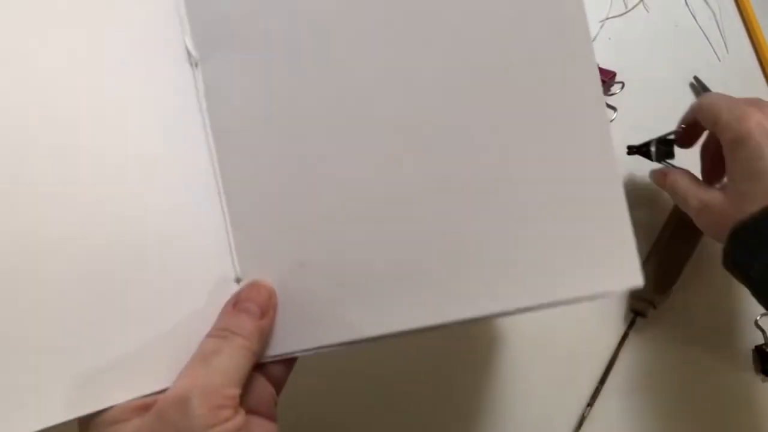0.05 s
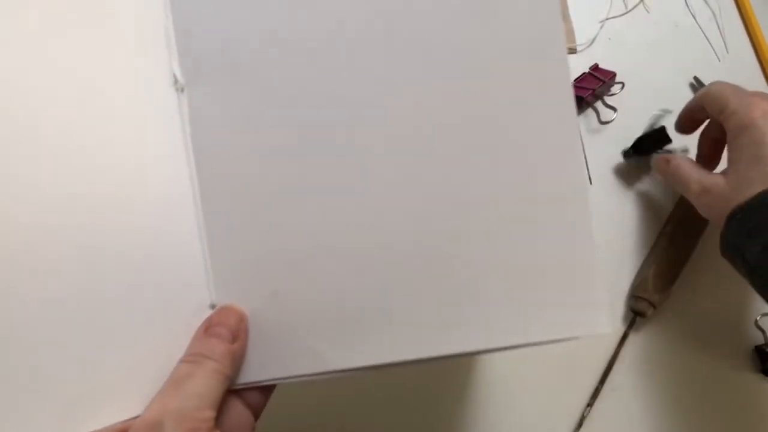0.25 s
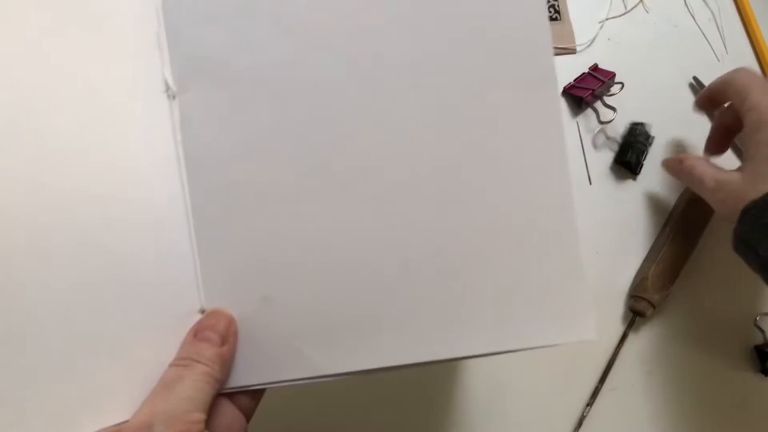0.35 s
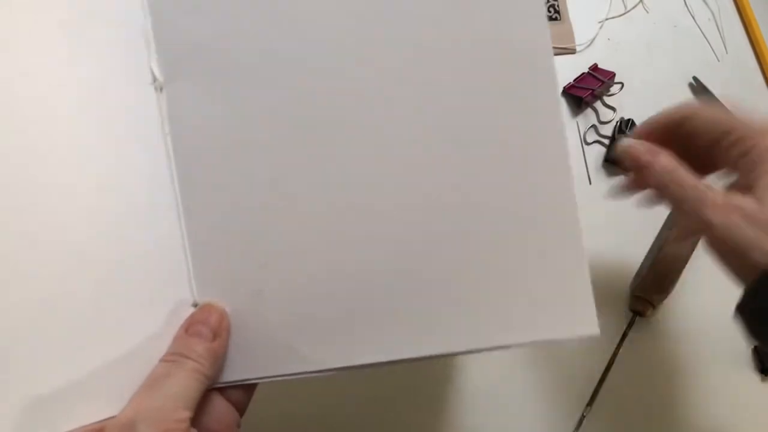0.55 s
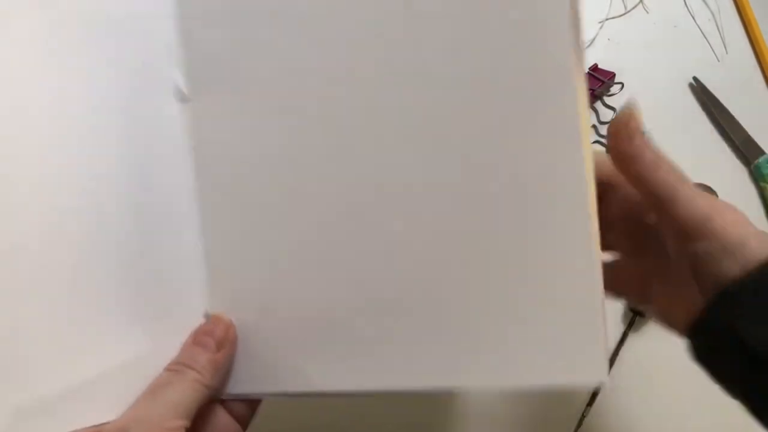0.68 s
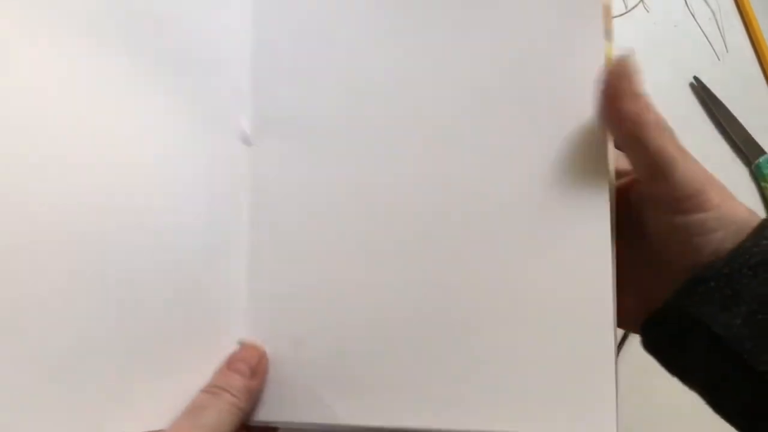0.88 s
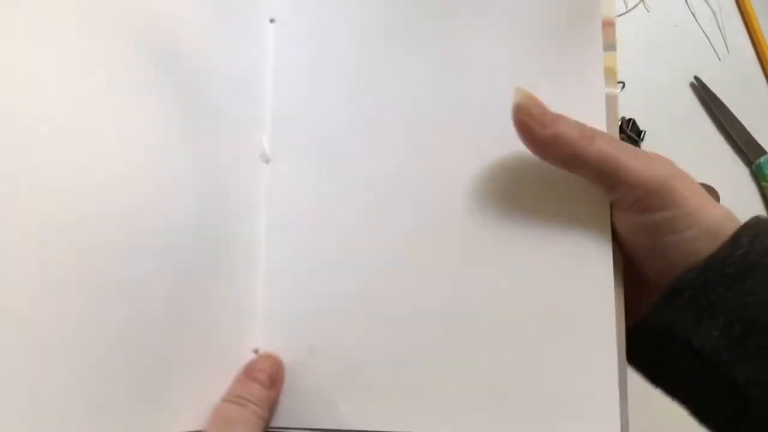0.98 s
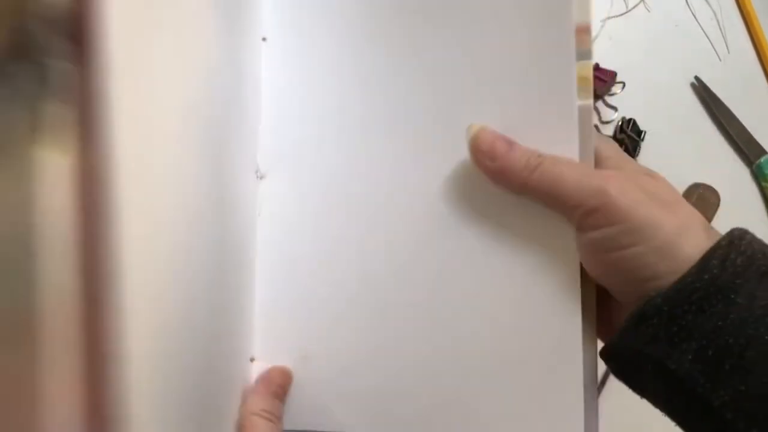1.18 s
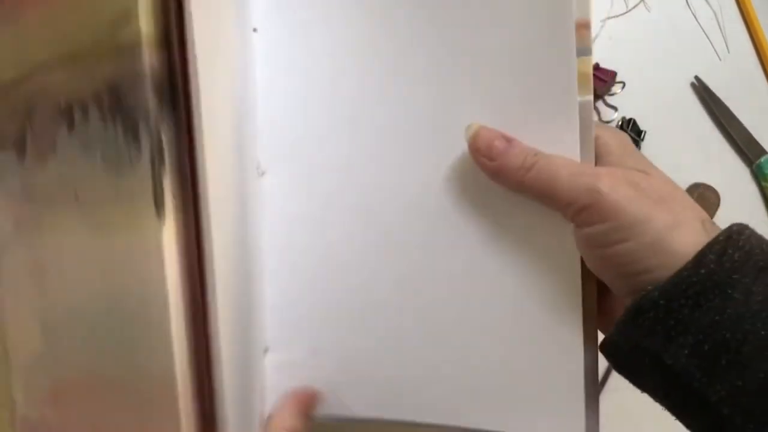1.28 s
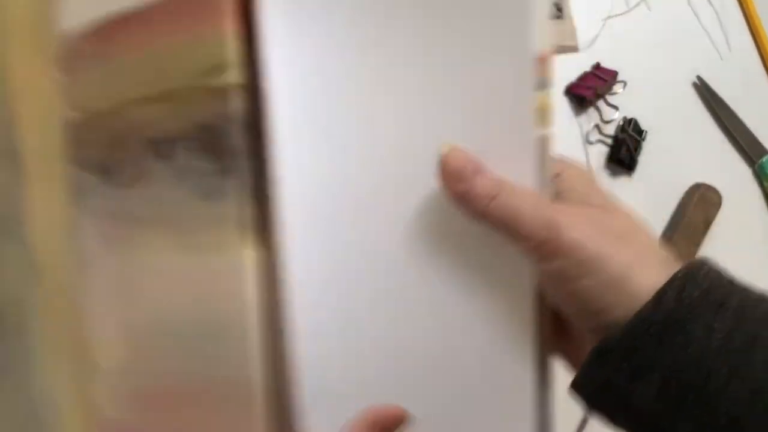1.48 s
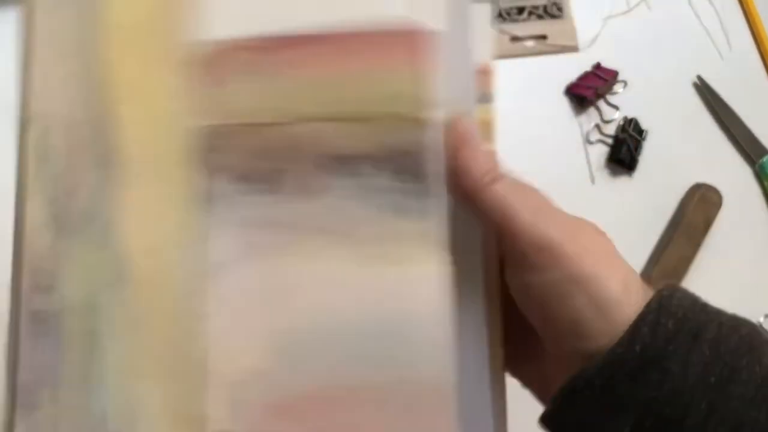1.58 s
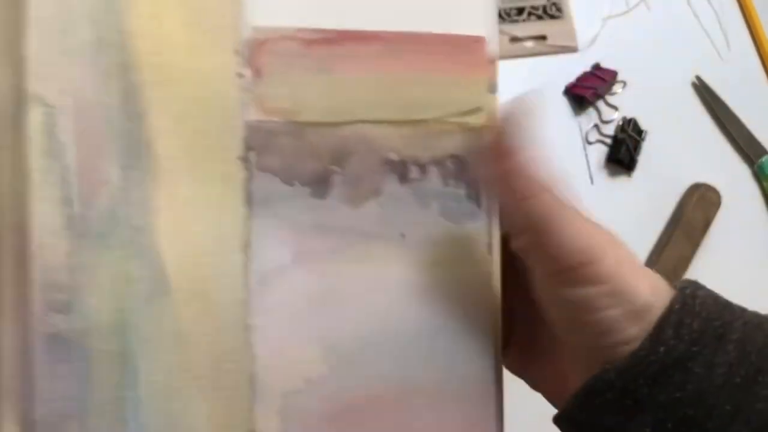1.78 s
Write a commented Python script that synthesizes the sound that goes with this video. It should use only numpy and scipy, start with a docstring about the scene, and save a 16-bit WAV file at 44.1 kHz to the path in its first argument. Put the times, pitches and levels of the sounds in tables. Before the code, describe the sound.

A small metal clip clatters on a table, then a stiff page is turned.

```python
"""A small steel binder clip drops on a table, bounces ever faster and rattles to rest: each hit rings
its spring and wire handles and knocks the tabletop. A hand then brushes a sketchbook, slides a stiff
page off the next one with a grainy rush of fibres and turns it. The page flaps down and fingers tap
the book. A small, quiet room."""
import sys
import numpy as np
from scipy import signal
from scipy.fft import rfft, irfft, next_fast_len
from scipy.io import wavfile
from scipy.ndimage import map_coordinates

SR = 44100
rng = np.random.default_rng(int(sys.argv[2]) if len(sys.argv) > 2 else 0)


def unload_wav(signal):
    """Save mono or channel-first audio to the path in sys.argv[1] as 16-bit WAV at rate SR, clipped to [-1, 1]."""
    wavfile.write(
        sys.argv[1],
        SR,
        np.round(np.clip(np.atleast_2d(signal).T, -1, 1) * 32767).astype(np.int16),
    )


N = 81585

SPRING_MODES = [(3376, -5.5, 0.019), (3660, -9, 0.011), (4055, -1, 0.02), (4290, -3.5, 0.025),
                (4604, 4, 0.023), (5000, -2.5, 0.037), (5360, -16, 0.024)]
# colour of the spring's noisy chatter: f/Hz, level/dB
CHATTER_COLOUR = [(300, -66), (2400, -15), (3300, -11.5), (4700, -3.5), (5300, -3.5), (6000, -9.5),
                  (8000, -13.5), (16000, -24.5)]
HARD_ATTACK_S, SOFT_ATTACK_S = 0.00055, 0.0017
CLIP_ROOM_DB, PAPER_ROOM_DB = -8.5, -21  # reverb sends


def binder_clip():
    """Each bounce rings the spring and its wire handles and knocks the table."""
    # hits: t/s, spring/dB, spring tilt/(dB per octave), handles/dB, crack/dB, clack/dB, thump/dB
    bounces = [(0.2324, -21.5, -4.5, -52, -24, -20.5, -28.5), (0.2819, -16, -6, -23, -30, -24, -32),
               (0.3435, -16.5, -1, -25, -23, -41, -27), (0.363, -30.5, -14, -52, -34, -36, -62),
               (0.401, -22.5, 0.5, -39, -26.5, -39.5, -32), (0.4369, -25, 5.5, -49, -34, -38, -36),
               (0.4596, -31, 6, -53.5, -40.5, -40, -39), (0.4753, -30.5, 12, -58, -47, -41, -46)]
    # thin ring of the wire handles: f/Hz, level/dB, t60/s
    handle_modes = [(9140, -12, 0.01), (9650, 1, 0.014), (10300, -7, .012), (10520, 1, 0.014)]
    # bright crack of the hit: f/Hz, level/dB
    crack_colour = [(500, -32), (3000, -27), (6500, -6), (8000, -4), (10000, -2.5), (11700, -6), (13500, 2),
                    (16000, -2)]
    # noisy part of the table's clack: f/Hz, level/dB
    clack_colour = [(80, -10), (200, 3.5), (450, 2), (700, -2.5), (1100, -2), (2000, -4.5), (2500, -7),
                    (5000, -2.5), (16000, -32.5)]
    # pitched part of the clack: f/Hz, level/dB, t60/s
    clack_modes = [(514, -3.5, 0.035), (930, -1, 0.087), (1153, 2.5, 0.055), (1467, -2.5, 0.062),
                   (1794, 3, 0.055), (2170, 4, 0.047), (2800, -4, 0.018)]
    # low ring of the whole tabletop: f/Hz, level/dB, t60/s
    table_modes = [(143.7, -4.5, 0.36), (202, -0.5, 0.049), (265, 3.5, 0.039), (293, 1.5, 0.12),
                   (430, -3, 0.085), (502, 1, 0.058)]
    table_lag_s = 0.00301  # the whole top swings a moment after the contact
    out = np.zeros(N)
    for s, spring_db, tilt_db, handles_db, crack_db, clack_db, thump_db in bounces:
        spring = burst(tilted(CHATTER_COLOUR, tilt_db), t60=0.018, attack=HARD_ATTACK_S)
        spring += amp(-6) * ring(tilted(SPRING_MODES, tilt_db), HARD_ATTACK_S, scatter_db=3.5)
        handles = ring(handle_modes, HARD_ATTACK_S, scatter_db=5)
        crack = burst(crack_colour, t60=0.035, attack=HARD_ATTACK_S)
        metal = amp(spring_db) * spring + amp(handles_db) * handles + amp(crack_db) * crack
        clack = burst(clack_colour, t60=0.035, attack=HARD_ATTACK_S)
        clack += amp(-8) * ring(clack_modes, HARD_ATTACK_S, scatter_db=2.5)
        clack += amp(-3.5) * push(push_s=0.00024)
        thump = 0.37 * ring(table_modes, SOFT_ATTACK_S, scatter_db=4.5) + push(push_s=0.00057)
        add(out, s, in_room(metal + amp(clack_db) * clack, CLIP_ROOM_DB))
        add(out, s + table_lag_s, amp(thump_db) * in_room(thump, room_db=-17.5, early_db=-12))
    return out


def rattle(count):
    start_s, length_s, attack_s = 0.405, 0.1, 0.0013
    out = np.zeros(N)
    for k in range(count):
        progress = (k + rng.random()) / count
        contact = ring(SPRING_MODES, attack_s, scatter_db=3)
        contact += amp(1) * burst(CHATTER_COLOUR, t60=0.046, attack=attack_s)
        add(out, start_s + length_s * progress, amp(-42.5 - 4 * progress ** 2) * contact)
    return in_room(out, CLIP_ROOM_DB)


def page_slide():
    """The page drags over its neighbour, brightens towards the edge and comes free."""
    # fader moves of the slide: t/s, body/dB, hiss/dB
    moves = [(0.87, -75, -93), (0.924, -51.5, -62.5), (0.99, -61, -69), (1.026, -56, -65),
             (1.042, -51, -81), (1.052, -60, -70), (1.106, -55.5, -72), (1.136, -46, -60),
             (1.168, -42.5, -68), (1.176, -52.5, -61), (1.202, -52.5, -60.5), (1.232, -46, -55),
             (1.33, -47, -44.5), (1.37, -45, -42), (1.394, -58, -66), (1.508, -53.5, -59), (1.53, -52, -49)]
    # midrange body of the rub: f/Hz, level/dB
    body_colour = [(100, -3), (400, -6.5), (800, -4.5), (1300, 0.5), (2600, 0), (4000, -2.5), (5500, -5),
                   (7500, -16), (11000, -28), (16000, -22)]
    # airy hiss on top: f/Hz, level/dB
    hiss_colour = [(200, -32), (2500, -7.5), (5000, -3), (8000, -2), (10500, -4), (13000, -2.5),
                   (16000, -8)]
    attack_s, release_s = 0.015, 0.11
    t = np.arange(N) / SR
    fade_in = (t - moves[0][0]) / attack_s
    fade_out = 1 + (moves[-1][0] - t) / release_s
    touching = np.clip(np.minimum(fade_in, fade_out), 0, 1)
    body_db, hiss_db = curves(moves)
    body = amp(body_db - 1.5) * friction(body_colour)
    hiss = amp(hiss_db + 0.5) * friction(hiss_colour)
    return touching * (body + hiss)


def scrapes():
    """Friction excites broad resonances that glide as the sheet bends."""
    # resonant sweeps: t/s, length/s, start f/Hz, end f/Hz, level/dB
    glides = [(0.726, 0.064, 1718, 1813, -57), (.89, 0.21, 946, 1267, -64), (0.9, 0.17, 3534, 3050, -59),
              (1.205, 0.061, 450, 898, -55), (1.25, 0.043, 2063, 2090, -48.5),
              (1.278, 0.098, 3400, 3100, -43.5), (1.297, 0.0504, 1390, 1728, -45.5)]
    out, t = np.zeros(N), np.arange(N) / SR
    for s, length, from_hz, to_hz, db in glides:
        progress = np.clip((t - s) / length, 0, 1)
        phase = 2 * np.pi * np.cumsum(from_hz + (to_hz - from_hz) * progress) / SR
        width_hz = 0.4 * to_hz
        band = wobble(width_hz) * np.cos(phase) + wobble(width_hz) * np.sin(phase)
        out += amp(db) * np.sin(np.pi * progress) * unit(band)
    return out


def brushes():
    """Short finger strokes over the paper swell and die away."""
    # finger strokes: t/s, rise/s, t60/s, level/dB
    strokes = [(0.638, 0.0088, 0.081, -46.5), (.68, 0.016, 0.049, -54.5), (0.727, 0.015, 0.19, -46.5),
               (.775, 0.024, 0.5, -58), (1.151, 0.0144, 0.024, -41), (1.582, 0.01, 0.038, -43.5),
               (1.62, 0.0033, 0.37, -51), (1.709, 0.051, 0.11, -51)]
    # swish of skin on paper: f/Hz, level/dB
    brush_colour = [(100, 2), (500, -7), (1000, 5), (1400, 0), (1800, -1.5), (3500, -3.5), (6500, -10.5),
                    (10500, -16), (13000, -13.5), (16000, -20)]
    level, t = np.zeros(N), np.arange(N) / SR
    for s, rise, t60, db in strokes:
        swell = np.clip((t - s) / rise, 0, 1)
        decay = np.exp(-np.log(1000) * np.maximum(t - s - rise, 0) / t60)
        level += amp(db) * swell * decay
    return level * friction(brush_colour)


def taps():
    """The paper snaps, the sheet flaps at a pitch set by where it is held, and the book thuds."""
    # page and fingers strike the book: t/s, snap/dB, flap/dB, flap pitch/Hz, thud/dB
    hits = [(0.738, -51, -51, 1700, -59), (1.0373, -49, -40, 1180, -49.5), (1.08, -59, -46, 600, -50),
            (1.1657, -58, -37, 1400, -60), (1.5355, -30.5, -45, 900, -58), (1.5418, -52, -47, 710, -39.5),
            (1.567, -32, -37, 1500, -45), (1.5771, -35.5, -29, 830, -30.5), (1.587, -45, -51, 3020, -36),
            (1.627, -38.5, -42, 1140, -71), (1.758, -50, -38.5, 745, -43),
            (1.829, -38.5, -34.5, 950, -41.5)]
    # crisp snap of the paper: f/Hz, level/dB
    snap_colour = [(200, 13.5), (1000, -15), (3500, 4.5), (6500, -4.5), (10500, -6.5), (13000, -2),
                   (16000, -11)]
    # flap of the sheet: multiple of its pitch, level/dB
    flap_shape = [(.07, -29), (.3, 0), (.62, -3.5), (1, 8.5), (1.4, -3.5), (2.2, -12), (6, -19), (17, -43)]
    # dull thud of the book: f/Hz, level/dB
    thud_colour = [(25, 7), (58, -5), (110, -24), (300, 3.5), (500, -9), (1000, -39), (4000, -45)]
    # low ring of the book: f/Hz, level/dB, t60/s
    book_modes = [(81.5, -7.5, 0.1), (168, -15, 0.036), (284, 2, 0.081), (321, 1.5, 0.043),
                  (408, -1, 0.066)]
    out = np.zeros(N)
    for s, snap_db, flap_db, flap_hz, thud_db in hits:
        thud = amp(-4.5) * burst(thud_colour, t60=0.07, attack=SOFT_ATTACK_S)
        thud += amp(-2.5) * ring(book_modes, SOFT_ATTACK_S, scatter_db=4)
        thud += amp(-4.5) * push(push_s=0.00082)
        flap_colour = [(flap_hz * multiple, db) for multiple, db in flap_shape]
        flap = amp(-2.5) * burst(flap_colour, t60=0.038, attack=HARD_ATTACK_S)
        snap = burst(snap_colour, t60=0.0097, attack=0.0001)
        add(out, s, amp(snap_db) * snap + amp(flap_db) * flap + amp(thud_db) * thud)
    return out


def background():
    """Room tone and the low rumble of the book being moved."""
    # room tone: f/Hz, level/dB
    room_colour = [(20, 1), (35, -35), (58, 3.5), (95, 0.5), (135, -1), (175, -13), (300, -6.5), (520, -22),
                   (1000, -19), (2000, -19), (10000, -26.5), (16000, -32)]
    # handling rumble: f/Hz, level/dB
    rumble_colour = [(20, 1), (55, -4), (130, -9), (300, -13.5), (700, -16), (3000, -50)]
    # fader moves of the rumble: t/s, level/dB
    moves = [(0, -66), (.6, -68.5), (.75, -67.5), (.9, -64.5), (1.12, -52), (1.25, -59.5), (1.48, -61.5),
             (1.55, -65), (1.7, -61.5), (1.85, -62)]
    rumble_db, = curves(moves)
    return amp(-62) * noise(room_colour, N) + amp(rumble_db) * noise(rumble_colour, N)


def in_room(x, room_db, early_db=-11.5):
    """The sound with near reflections off the table and a short room tail."""
    # decay of the room: f/Hz, t60/s
    room_t60 = [(100, 0.28), (500, 0.32), (2000, 0.31), (5000, 0.18), (15000, 0.13)]
    size, build_s = SR // 2, 0.0013
    hz, t, spectrum = signal.stft(rng.standard_normal(size), SR, nperseg=256)
    decay = np.exp(-np.log(1000) * t / along(room_t60, hz)[:, None])
    tail = signal.istft(spectrum * decay, SR, nperseg=256)[1][:size]
    tail *= 1 - np.exp(-np.arange(size) / SR / build_s)
    early = rng.standard_normal(size) * fade(t60=0.056, attack=build_s)
    response = amp(room_db) * tail / np.linalg.norm(tail) + amp(early_db) * early / np.linalg.norm(early)
    return x + signal.fftconvolve(x, response)[:len(x)]


def ring(modes, attack, scatter_db):
    """Damped modes, each struck a little differently every time."""
    out, t = np.zeros(SR // 2), np.arange(SR // 2) / SR
    for k, (hz, db, t60) in enumerate(modes):
        gain = (-1) ** k * amp(db + scatter_db * rng.normal())
        out += gain * fade(t60, attack) * np.sin(2 * np.pi * hz * t)
    nominal_rms = np.linalg.norm([amp(db) for _, db, _ in modes]) / np.sqrt(2)
    return out / nominal_rms


def burst(colour, t60, attack):
    """Dense, quickly dying vibration after a contact."""
    return noise(colour, SR // 2) * fade(t60, attack)


def push(push_s):
    """One low pulse of air as a struck surface gives and returns."""
    u = np.arange(SR // 2) / SR / push_s
    shape = u * (2 - u) * np.exp(-u)
    return shape / shape.max()


def friction(colour):
    """Paper fibres catch and slip: a finely grained rush."""
    grain_db, grain_hz = 1.5, 883
    return unit(noise(colour, N) * amp(grain_db * wobble(grain_hz) + 0.26 * wobble(70.9)))


def tilted(rows, slope_db):
    """A colour or mode table brightened or dulled about the spring's main ring."""
    pivot_hz = SPRING_MODES[4][0]
    return [(hz, db + slope_db * np.clip(np.log2(hz / pivot_hz), -1, .5), *rest)
            for hz, db, *rest in rows]


def noise(colour, size):
    """Coloured noise of rms 1."""
    m = next_fast_len(size)
    gain = amp(along(colour, np.fft.rfftfreq(m, 1 / SR)))
    return unit(irfft(rfft(rng.standard_normal(m)) * gain, m)[:size])


def fade(t60, attack):
    """Half a second of quick rise and exponential decay."""
    t = np.arange(SR // 2) / SR
    return np.exp(-np.log(1000) * t / t60) * (1 - np.exp(-t / attack))


def wobble(rate):
    """A smooth random curve, rate knots a second."""
    return map_coordinates(rng.standard_normal(int(N * rate / SR) + 4), [np.arange(N) * rate / SR])


def curves(rows):
    """One value per sample for each column after the time."""
    times, *columns = np.transpose(rows)
    return [np.interp(np.arange(N) / SR, times, column) for column in columns]


def along(points, hz):
    """Read a curve at hz on a log frequency axis."""
    freqs, values = np.transpose(points)
    return np.interp(np.log(hz + 1), np.log(freqs + 1), values)


def amp(db):
    """Decibels to gain."""
    return 10 ** (np.asarray(db) / 20)


def unit(x):
    """Scale to rms 1."""
    return x / np.sqrt(np.mean(x ** 2) + 1e-20)


def add(track, s, sound):
    """Mix a sound in at time s."""
    part = track[round(s * SR):][:len(sound)]
    part += sound[:len(part)]


def scene():
    """Clip, paper and room tone in one mono mix."""
    paper = page_slide() + scrapes() + brushes() + taps()
    return (binder_clip() + rattle(count=16) + in_room(paper, PAPER_ROOM_DB) + background())[None]


def record(dry):
    """Roll off the deepest bass and cut the very top."""
    low_cut_hz, top_hz = 35.6, 15800
    dry = signal.sosfilt(signal.butter(2, low_cut_hz, "highpass", fs=SR, output="sos"), dry)
    m = next_fast_len(N + SR // 2)
    passband = np.fft.rfftfreq(m, 1 / SR) < top_hz
    return irfft(rfft(dry, m) * passband, m)[..., :N]


dry = scene()
out = record(dry)
unload_wav(out)
```